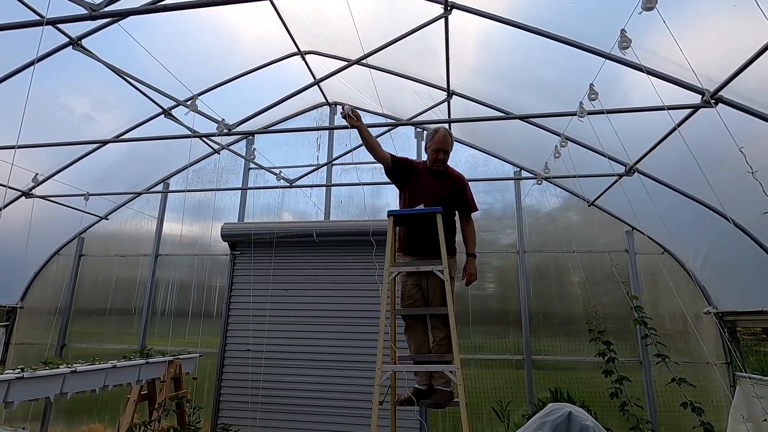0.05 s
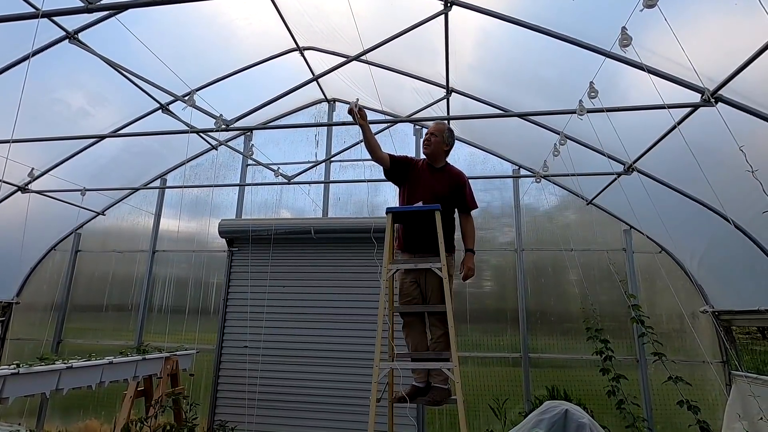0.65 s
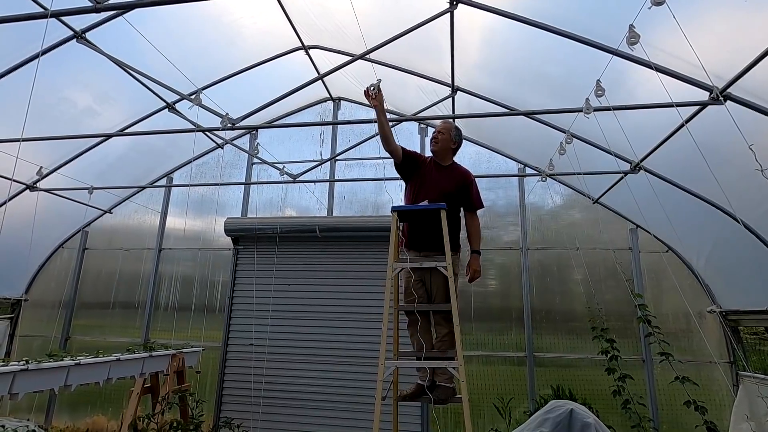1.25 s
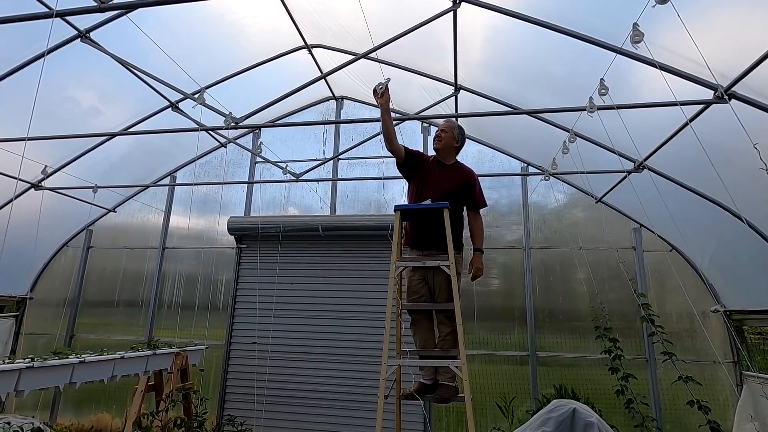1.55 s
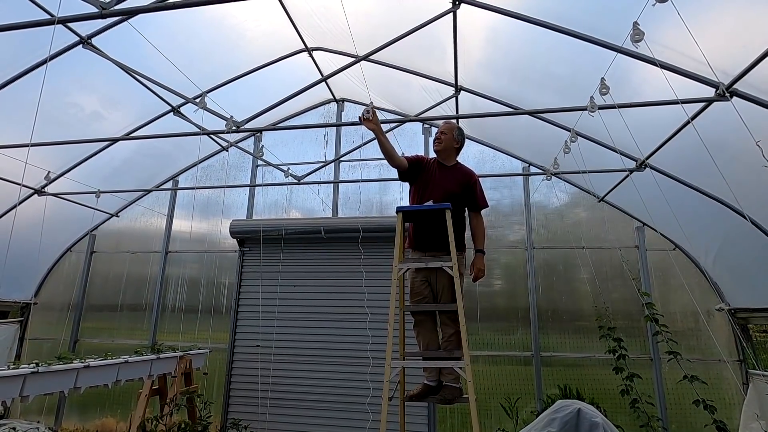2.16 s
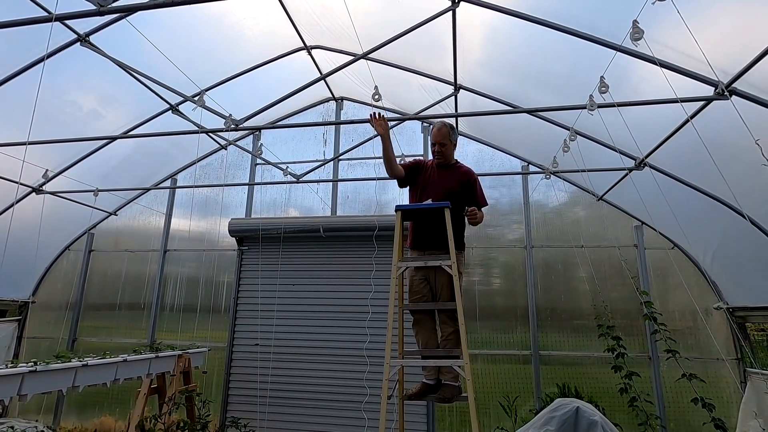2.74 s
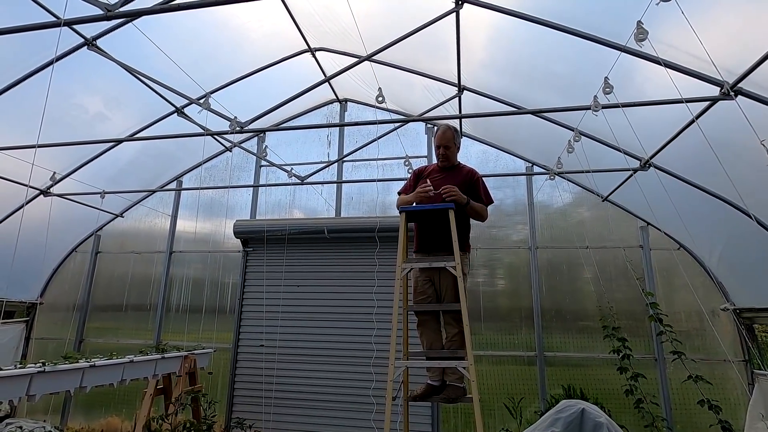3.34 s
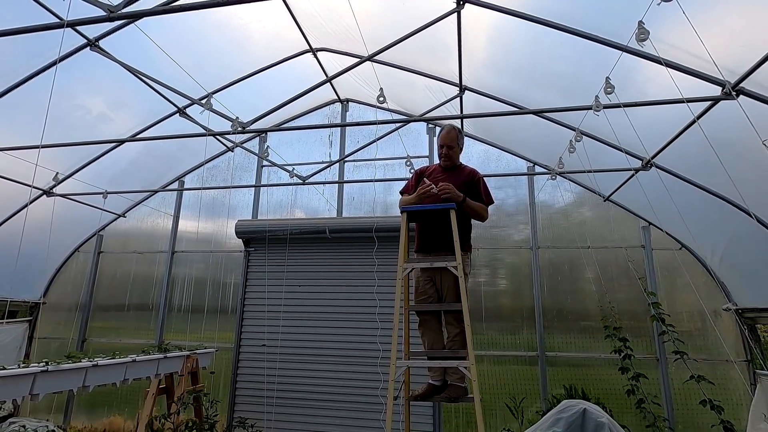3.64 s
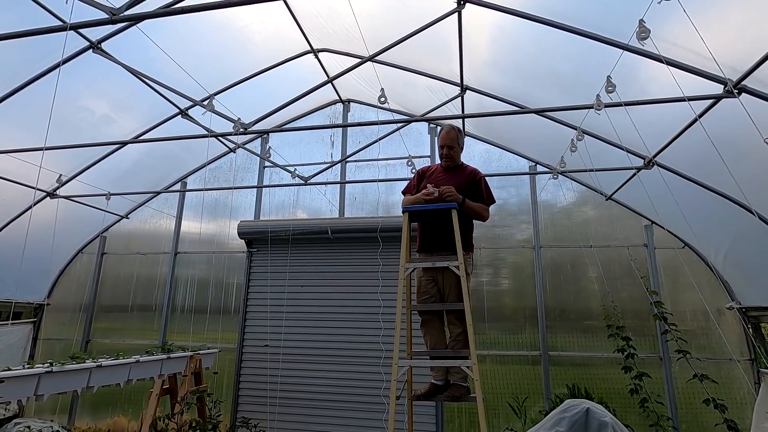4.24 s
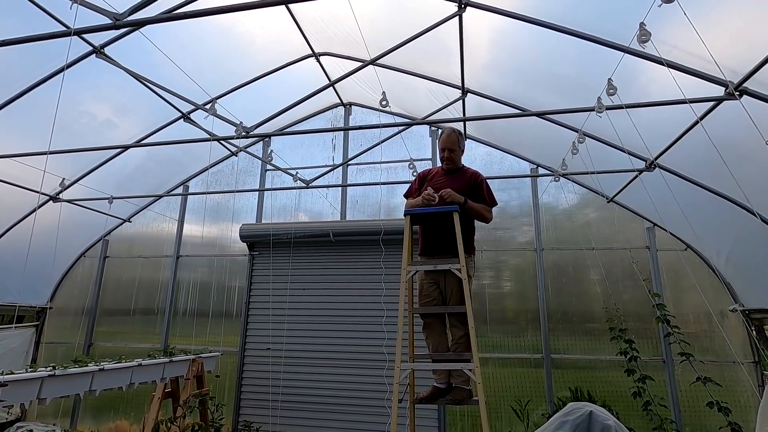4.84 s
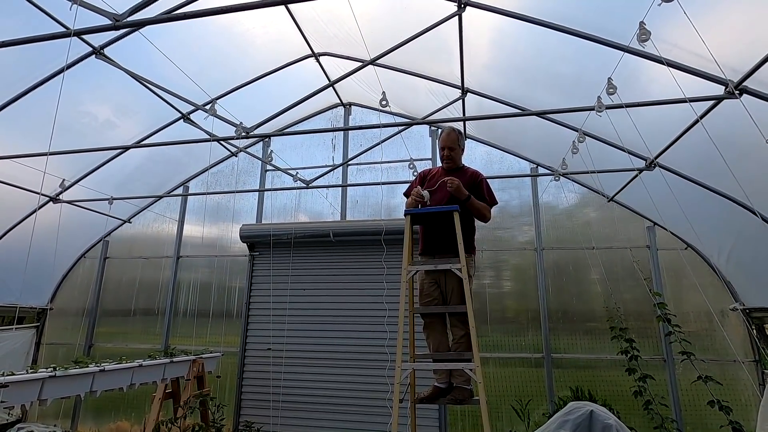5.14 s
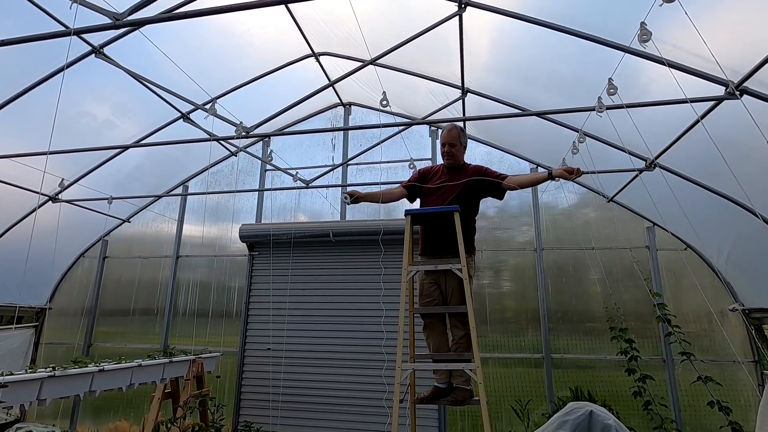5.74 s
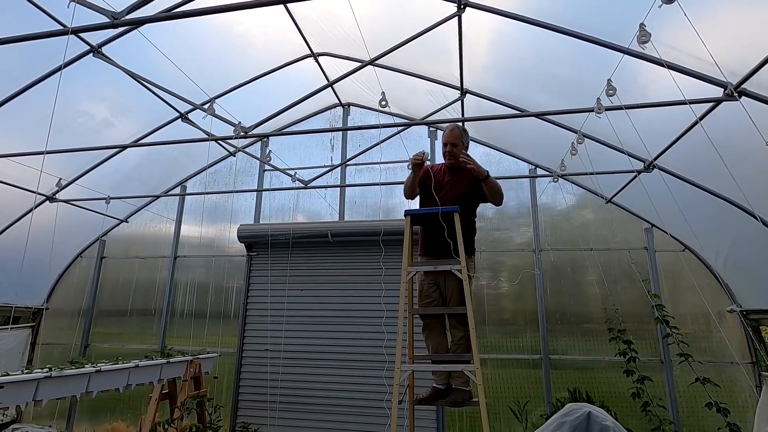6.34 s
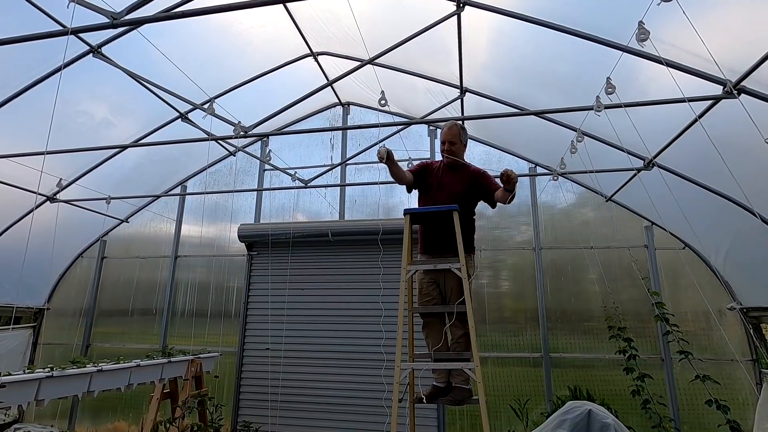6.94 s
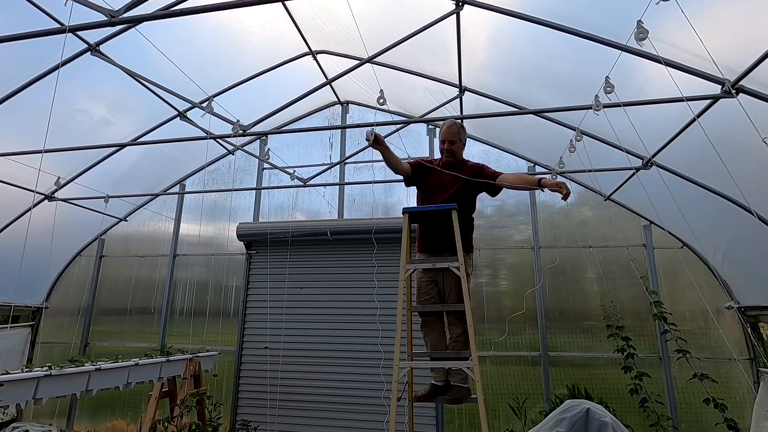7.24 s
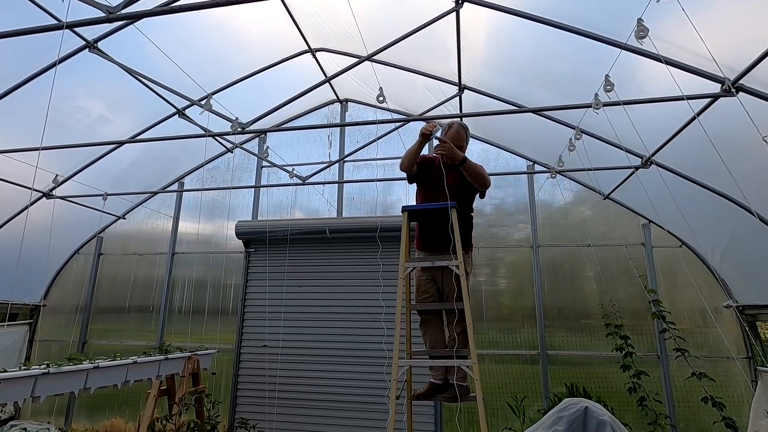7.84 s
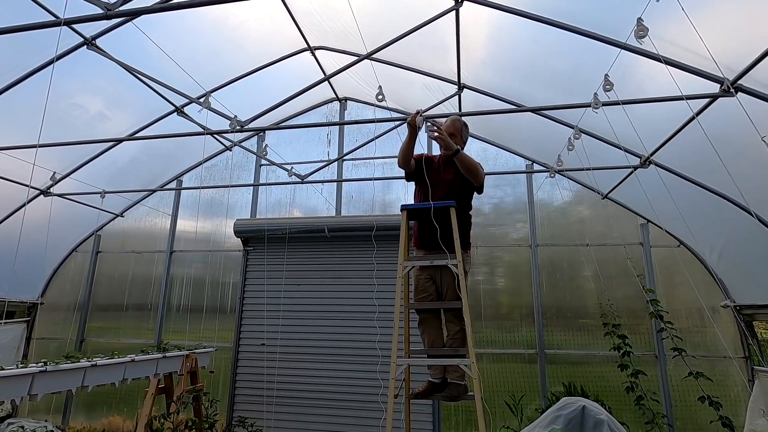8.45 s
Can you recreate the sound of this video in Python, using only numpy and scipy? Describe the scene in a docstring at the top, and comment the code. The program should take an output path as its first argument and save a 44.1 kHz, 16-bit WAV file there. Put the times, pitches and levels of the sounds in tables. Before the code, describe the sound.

A deep, steady mix of fan drone and wind rumble fills a greenhouse, with birds chirping faintly beyond the cover. Someone on a stepladder pulls cord through a hanger, making a short high squeal, some snaps and dull knocks that echo briefly. A nearer bird gives two calls and a quick string of pips. Soft cord rubbing and scattered clicks continue under the swelling gusts.

```python
"""Inside a plastic-covered greenhouse, fans hum and birds sing outside from start to finish, while gusts
rumble over the cover and make the air throb. After a second, someone on a stepladder draws cord through
a squeaky hanger, with small clicks and dull knocks. Just past four seconds a nearby bird calls twice and
adds a fading run of pips. From about then on, more cord is paid out, rubbing and clicking.
The floor and the arched cover give the work short echoes."""
import sys
import numpy as np
from scipy import signal
from scipy.fft import rfft, irfft
from scipy.io import wavfile
from scipy.ndimage import uniform_filter1d

SR = 44100
rng = np.random.default_rng(int(sys.argv[2]) if len(sys.argv) > 2 else 0)


def waveform_to_disk(signal):
    """Save audio, clipped to [-1, 1], as 16-bit WAV at the path in sys.argv[1]."""
    frames = np.transpose(np.atleast_2d(signal))
    scaled = np.clip(frames, -1, 1) * 32767
    samples = np.round(scaled).astype(np.int16)
    wavfile.write(sys.argv[1], SR, samples)


N = 378819
TIME = np.arange(N) / SR


# Pulls on the cord. Each row: fastest moment, time speeding up, time slowing (all seconds), level in dB.
CORD_PULLS = [(1.27, .12, 0.085, -71), (1.6, .06, 0.057, -64.5), (1.78, 0.11, 0.19, -74),
              (2.06, 0.25, 0.11, -64.5), (2.21, 0.11, 0.083, -57), (2.42, 0.17, 0.65, -75.5),
              (4.95, .8, 0.6, -75), (5.45, 0.32, 0.2, -71), (5.75, 0.18, .15, -75.5),
              (7.22, .65, .1, -72.5), (8.28, .08, 0.13, -76)]
# The tone of the rubbing. Each row: frequency in Hz, boost or cut in dB.
RUB_TONE = [(300, 4), (1250, 10.5), (2000, 0.5), (3800, 8), (4800, 2.5), (6500, 2), (9000, -2),
            (12000, -31), (15000, -33)]

def cord_rub(grain_db=3, snags_per_s=60, snag_db=-8):
    """The cord's fibres slip in tiny jerks and now and then snag, louder as it moves faster."""
    grains = rng.standard_normal(N) * undb(grain_db * np.minimum(rng.exponential(size=N), 5))
    snags = (rng.random(N) < snags_per_s / SR) * rng.uniform(-0.81, 1, N)
    rub = unit(colour(unit(grains) + undb(snag_db) * unit(snags), RUB_TONE))
    flicker = undb(3.87 * drift(60))
    sliding = sum(undb(db) * swell(s, rise, fall) ** 2 for s, rise, fall, db in CORD_PULLS)
    return rub * flicker * sliding


# The notes the hanger rings at. Each row: pitch in Hz, spread around that pitch in Hz, level in dB.
HANGER_NOTES = [(3832, 24, 4), (4120, 460, -0.5), (6700, 80, -17), (10900, 120, -13)]

def hanger_squeal(from_s=1.67, to_s=2.23, level_db=-64.5, rise_db_per_s=38, fall_db_per_s=45):
    """Cord drawn through the metal hanger makes it ring: a thin squeal that grows, holds and fades."""
    squeal = unit(sum(undb(db) * ring(hz, width) for hz, width, db in HANGER_NOTES))
    chatter = undb(2 * drift(39.66))
    fade_db = rise_db_per_s * np.maximum(from_s - TIME, 0) + fall_db_per_s * np.maximum(TIME - to_s, 0)
    return squeal * chatter * undb(level_db - fade_db)


# Clicks of cord and hardware. Each row: start in seconds, level of the snap in dB, extra treble in dB.
CLICK_HITS = [(1.1351, -45, -8), (1.583, -39.5, -8), (2.0034, -47, 0), (2.1075, -41.5, -16),
              (2.164, -49, -1), (2.1721, -26.5, 1.5), (3.163, -45, -14), (4.005, -47, -2), (4.585, -48, -3),
              (5.073, -46, -7), (5.185, -46, -4), (5.47, -45.5, -5), (5.8078, -40, -8), (5.817, -36, -8),
              (5.835, -43, -7), (6.6868, -29.5, -14.5), (6.872, -52, 0), (7.1231, -47, -6),
              (7.1907, -47, -6), (7.235, -49, -1)]
# The tone of a click. Each row: frequency in Hz, boost or cut in dB.
CLICK_TONE = [(300, -9), (1400, -11), (2000, 6), (3300, 3.5), (4600, -5), (6500, 0.5), (11000, -3),
              (15000, -27)]

def clicks(soft_db=-54, rattle_decay_s=0.012, bounce_s=0.0053, bounce_db=-5):
    """Sharp snaps, each with a short rattle and one quick, duller echo."""
    out, t = np.zeros(N), np.arange(SR // 4) / SR
    lead = SR // 500  # room for the filter to ring just before the snap
    snap = signal.unit_impulse(len(t))
    for s, db, treble_db in CLICK_HITS:
        rattle_db = -13 - 0.4284 * (db - soft_db)  # soft clicks are mostly rattle, hard ones mostly snap
        rattle = 0.45 * undb(rattle_db) * rng.standard_normal(len(t)) * np.exp(-t / rattle_decay_s)
        tone = [(hz, boost + treble_db * np.clip(np.log2(hz / 3400), 0, 1)) for hz, boost in CLICK_TONE]
        click = colour(np.roll(snap + rattle, lead), tone) / colour(snap, tone).max()
        add(out, s - lead / SR, undb(db) * click)
    bounce = colour(out, [(100, 0), (3500, 0), (12000, -7)])
    return out + undb(bounce_db) * np.roll(bounce, int(bounce_s * SR))


# Knocks on the ladder. Each row: start in seconds, peak level in dB.
LADDER_KNOCKS = [(1.582, -48.5), (2.18, -46.5), (3.164, -45.5)]
# The notes the ladder rings at. Each row: pitch in Hz, level in dB, seconds to fade by 60 dB.
LADDER_NOTES = [(368, -6, 0.084), (400, -7.5, 0.13), (549, -9, 0.19), (620, -7, 0.24), (860, -8, 0.11),
                (1110, -7.5, 0.09), (1365, -8, 0.042), (1770, -19, 0.062), (2460, -29, 0.042),
                (2870, -15.5, 0.15)]

def ladder_knocks(scuff_decay_s=0.0095):
    """A brief scuff sets the ladder's frame ringing with a dull knock."""
    out, t = np.zeros(N), np.arange(SR // 3) / SR
    frame = sum(undb(db - 60 * t / fade_s) * np.sin(2 * np.pi * hz * t)
                for hz, db, fade_s in LADDER_NOTES)
    for s, db in LADDER_KNOCKS:
        scuff = rng.standard_normal(len(t)) * np.exp(-t / scuff_decay_s)
        knock = signal.fftconvolve(frame, scuff)
        add(out, s, undb(db) * knock / np.abs(knock).max())
    return out


# Gusts. Each row: middle in seconds, length in seconds, rumble in dB, moan in dB, moan pitch in Hz.
WIND_GUSTS = [(0.651, 1.4, -59.5, -72, 350), (1.128, 0.46, -56, -58, 429.8),
              (1.374, 0.29, -52.5, -63.5, 422), (1.704, 0.54, -60, -61.5, 338),
              (2.275, 0.48, -52.5, -66, 330.8), (2.516, .6, -55, -59, 347), (4.118, 0.56, -55.5, -62, 341),
              (4.354, .35, -52, -62.5, 418.4), (4.9, 0.43, -71, -59.5, 333), (5.16, 0.45, -55, -70, 327.3),
              (6.301, 2.4, -58, -76, 324.7), (7.432, 0.56, -58, -61, 338), (8.254, 0.38, -56, -66, 328)]
# The tone of the rumble. Each row: frequency in Hz, boost or cut in dB.
RUMBLE_TONE = [(60, -5), (125, -1), (170, 2), (230, -8.5), (320, -13), (450, -28.5), (1500, -48.5)]

def gusts(rest_rumble_db=-59.5, rest_moan_db=-73.5):
    """Wind rumbles and moans over the cover, sinking to a breeze between gusts."""
    s, length, rumble_db, moan_db, moan_hz = np.transpose(WIND_GUSTS)
    rumble = unit(colour(rng.standard_normal(N), RUMBLE_TONE))
    moan = wind_moan(np.interp(TIME, s, moan_hz))
    return (rumble * surges(s, length, rumble_db, rest_rumble_db)
            + moan * surges(s, length, moan_db, rest_moan_db))


# Floor echoes boost some pitches and cancel others. Each row: frequency in Hz, boost or cut in dB.
FLOOR_TONE = [(100, 2.5), (335, 3), (400, -8), (480, 3.5), (570, -19), (720, 11)]

def wind_moan(pitch_hz, wander_hz=25):
    """Swirling air makes a broad band of noise around a moving pitch."""
    swirls = colour(rng.standard_normal(N), [(2, 3.5), (35, 3.5), (80, 1), (160, -12), (900, -70)])
    centre = sine(pitch_hz + wander_hz * drift(60))
    return colour(unit(swirls * centre), FLOOR_TONE)  # multiplying lifts the low noise up to the pitch


# Billows of the cover. Each row: middle in seconds, length in seconds, level in dB.
COVER_BILLOWS = [(0.276, 0.16, -32), (0.94, 0.27, -37), (1.303, 0.26, -34), (2.13, 0.25, -30.5),
                 (3.796, 1.0, -32), (4.7, 1.0, -29), (5.43, 0.62, -28), (6.745, 0.59, -25),
                 (7.196, 0.32, -31.5)]

def air_throb(throb_hz=12.1, uneven_db=2, rest_db=-38):
    """The billowing cover pumps the air inside, which pulses at its own very deep pitch."""
    throb = np.sqrt(2) * np.sin(2 * np.pi * throb_hz * TIME + 0.8 * drift(2.8))
    uneven = undb(uneven_db * drift(9))
    return throb * uneven * surges(*np.transpose(COVER_BILLOWS), rest_db)


# The nearest bird's calls. Each row: start in seconds, pip pitch in Hz, pip in dB, sweep in dB.
NEAR_CALLS = [(4.343, 3985, -66, -61.5), (4.734, 3890, -58.5, -58)]
# Its closing run of pips. Each entry: pitch in Hz.
RUN_PITCHES = [4700, 4950, 4760, 4770, 4790, 4850, 4720]

def near_bird(pip_s=0.03, sweep_after_s=0.045, echo_s=0.085, echo_db=-8,
              run_start_s=5.12, run_step_s=0.107, run_db=-64, run_fade_db_per_s=6):
    """Two calls, each a pip and an upward sweep with three echoes, then a fading run of pips."""
    pips, sweeps, run = np.zeros((3, N))
    for s, hz, pip_db, sweep_db in NEAR_CALLS:
        add(pips, s, undb(pip_db) * clear_note(pip_s, hz))
        sweep = bird_note(length_s=0.052, start_hz=2680, end_hz=3645, trill_depth_hz=70)
        add(sweeps, s + sweep_after_s, undb(sweep_db) * sweep)
    for k, hz in enumerate(RUN_PITCHES):
        late = k * run_step_s
        add(run, run_start_s + late, undb(run_db - run_fade_db_per_s * late) * clear_note(pip_s, hz))
    returning = pips + undb(-5) * sweeps
    repeats = sum(undb(k * echo_db) * np.roll(returning, int(k * echo_s * SR)) for k in (1, 2, 3))
    return pips + sweeps + run + repeats


# Buzzy bird notes. Each row: start and length in seconds, first and last pitch in Hz, level in dB.
BUZZY_NOTES = [(.22, 0.098, 2880, 3400, -75), (.58, 0.094, 3420, 2850, -67),
               (0.798, 0.051, 3043, 3080, -65), (.91, 0.19, 3910, 3890, -66.5),
               (1.24, 0.046, 4080, 3950, -65), (1.278, .08, 2700, 3050, -66),
               (2.56, 0.045, 7190, 6650, -68), (2.798, .25, 3300, 3450, -76),
               (3.88, 0.097, 3580, 3720, -72), (5.32, 0.1, 3780, 3510, -70), (5.869, .15, 3250, 3300, -65),
               (7.15, 0.085, 3730, 3800, -71), (7.532, 0.076, 2900, 3050, -73),
               (7.675, .13, 3115, 3670, -70), (8.017, .1, 3200, 2932, -69.5),
               (8.227, 0.062, 2980, 3090, -68), (8.328, .18, 3650, 3950, -72)]
# Clear bird notes. Each row: start and length in seconds, pitch in Hz, level in dB.
CLEAR_NOTES = [(1.477, .08, 3290, -65), (2.36, 0.072, 3437, -66), (2.496, 0.1, 2116, -70),
               (3.978, 0.13, 3244, -73.5), (6.077, 0.097, 3535, -70.5), (7.556, 0.043, 3560, -66),
               (7.651, 0.13, 3620, -69)]

def birds(far_db=-81, far_range_hz=(2600, 3800), far_notes=40):
    """Birds warble and whistle over a faint chorus from the far trees."""
    out = np.zeros(N)
    for s, length, start_hz, end_hz, db in BUZZY_NOTES:
        add(out, s, undb(db) * bird_note(length, start_hz, end_hz, trill_depth_hz=143))
    for s, length, hz, db in CLEAR_NOTES:
        add(out, s, undb(db) * clear_note(length, hz))
    for when, *ends in rng.random((far_notes, 3)):
        start_hz, end_hz = np.interp(ends, [0, 1], far_range_hz)
        add(out, when * N / SR, undb(far_db) * bird_note(0.12, start_hz, end_hz, trill_depth_hz=80))
    return out


def bird_note(length_s, start_hz, end_hz, trill_depth_hz, trills_per_s=70):
    """One note: the pitch slides and levels off, with a fast, uneven trill."""
    t = np.arange(int(length_s * SR)) / SR
    progress = t / length_s
    slide_hz = end_hz + (start_hz - end_hz) * (1 - progress) ** 2
    flutter = np.interp(progress, np.linspace(0, 1, 20), rng.standard_normal(20))
    trill = np.sin(2 * np.pi * trills_per_s * t) + 0.51 * flutter
    return np.sin(np.pi * progress) * sine(slide_hz + trill_depth_hz * trill)


def clear_note(length_s, hz, sag_hz=51.3):
    """An almost pure note that sags onto its pitch."""
    return bird_note(length_s, hz + sag_hz, hz, trill_depth_hz=25.3)


# The steady rush of air. Each row: frequency in Hz, noise level in dB per Hz.
AIR_RUSH = [(21, -62), (29, -72), (40, -66.5), (56, -72), (150, -81), (260, -85.5), (335, -87), (400, -94),
            (480, -89.5), (570, -94), (780, -90.5), (1050, -96), (1600, -99), (2500, -104.5), (3600, -107),
            (4300, -112.5), (7000, -116), (15000, -119.5)]
# Fan and motor tones. Each row: pitch in Hz, average level in dB, amount of waver from 0 to 1.
FAN_TONES = [(71.7, -75, 0.1), (80.47, -52, 0.07), (121.7, -62, .4), (141.3, -60, 0.24), (160, -64, 0.46),
             (163.9, -66.5, 0.5), (238.7, -60, 0.08), (286.9, -65.5, 0.3), (473, -79.5, 0),
             (1194, -83.5, 0.1)]

def ventilation():
    """Air rushes evenly, and the fan tones waver as the flow pushes on the blades."""
    air = colour(rng.standard_normal(N), AIR_RUSH) * np.sqrt(SR / 2)
    hum = 0
    for hz, db, waver in FAN_TONES:
        wobble = unit(1 + waver * (drift(9) + 1j * drift(9)))  # shakes both loudness and pitch
        spin = np.exp(1j * (2 * np.pi * hz * TIME + 0.67 * drift(1.21)))
        hum += np.sqrt(2) * undb(db) * (wobble * spin).real
    return air + hum


def undb(db):
    """Turn decibels into a number to multiply by."""
    return 10 ** (np.asarray(db) / 20)


def unit(x):
    """Scale a sound to an average (rms) level of 1."""
    return x / np.sqrt(np.mean(np.abs(x) ** 2))


def sine(hz):
    """A pure tone that follows a changing pitch."""
    return np.sin(2 * np.pi * np.cumsum(hz) / SR)


def colour(x, points):
    """Shape a sound's tone along (Hz, dB) points, fading out the bass below the first."""
    hz, db = np.transpose(points)
    f = np.maximum(np.fft.rfftfreq(len(x), 1 / SR), 1)
    gain = undb(np.interp(np.log(f), np.log(hz), db)) * np.minimum(f / hz[0], 1) ** 2
    return irfft(rfft(x) * gain, len(x))


def drift(steps_per_s):
    """A smooth random wander, typically about 1 in size."""
    k = max(int(SR / steps_per_s), 1)
    steps = np.repeat(rng.standard_normal(N // k + 2), k)
    return unit(uniform_filter1d(uniform_filter1d(steps, k), k)[:N])


def ring(hz, width_hz):
    """A ringing note kept going by random pushes."""
    pole = np.exp((2j * np.pi * hz - np.pi * width_hz) / SR)
    return unit(signal.lfilter([1], [1, -pole], rng.standard_normal(N)).imag)


def swell(peak_s, rise_s, fall_s):
    """A smooth rise to 1 and fall back to silence."""
    late = TIME - peak_s
    return np.cos(np.pi / 2 * np.clip(late / np.where(late < 0, rise_s, fall_s), -1, 1))


def surges(middles, lengths, levels_db, rest_db):
    """The strength of a steady flow with swells on top; their powers add up."""
    power = sum((undb(db) * swell(s, length / 2, length / 2)) ** 2
                for s, length, db in zip(middles, lengths, levels_db))
    return np.sqrt(undb(rest_db) ** 2 + power)


def add(track, start_s, sound):
    """Mix a sound into a track at a given time."""
    i = max(int(start_s * SR), 0)
    track[i:i + len(sound)] += sound[:max(N - i, 0)]


def echoes(x, fade_s, echo_db, treble_hz):
    """A sound plus a duller wash of echoes that drops 60 dB in fade_s."""
    t = np.arange(SR) / SR
    tail = rng.standard_normal(SR) * undb(-60 * t / fade_s) * np.minimum(t / 0.0053, 1)
    tail = signal.lfilter([1], [1, -np.exp(-2 * np.pi * treble_hz / SR)], tail)
    return x + undb(echo_db) * signal.fftconvolve(x, tail / np.linalg.norm(tail))[:N]


def scene():
    """Ladder work echoes under the cover, trees scatter the birdsong, and fans and wind carry on."""
    work = cord_rub() + hanger_squeal() + clicks() + ladder_knocks()
    work = echoes(work, fade_s=0.45, echo_db=-9.5, treble_hz=6500)
    song = echoes(birds() + near_bird(), fade_s=0.65, echo_db=-1, treble_hz=7000)
    return (work + song + ventilation() + air_throb() + gusts())[None]


def record(dry):
    """Cut away the very highest treble, above 15150 Hz."""
    return signal.sosfilt(signal.ellip(12, 0.1, 70, 15150, fs=SR, output="sos"), dry)


dry = scene()
out = record(dry)
waveform_to_disk(out)
```